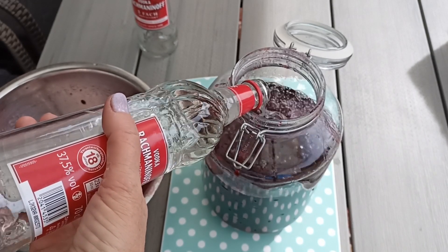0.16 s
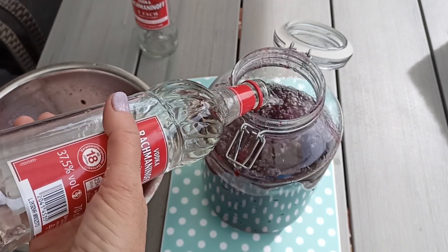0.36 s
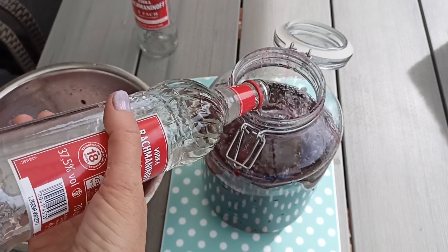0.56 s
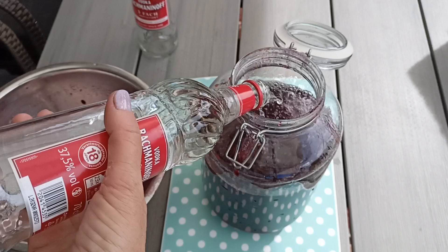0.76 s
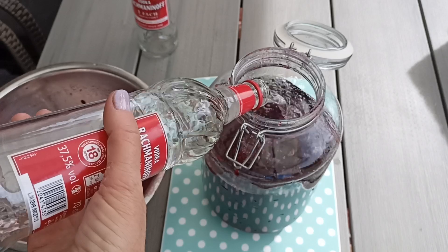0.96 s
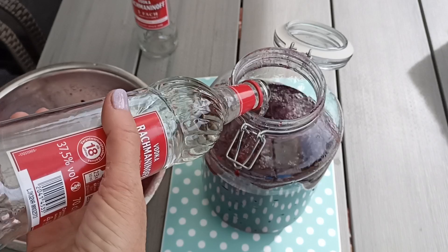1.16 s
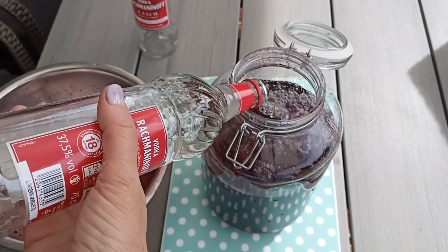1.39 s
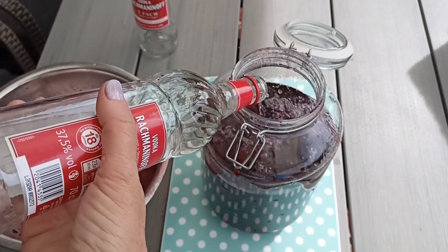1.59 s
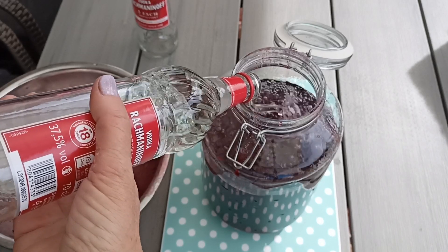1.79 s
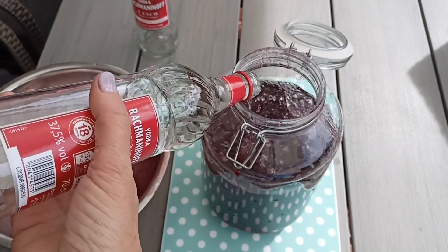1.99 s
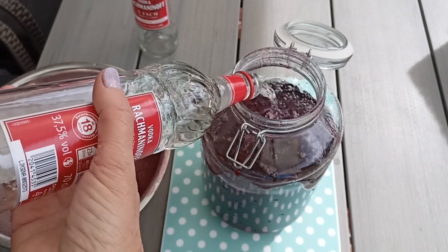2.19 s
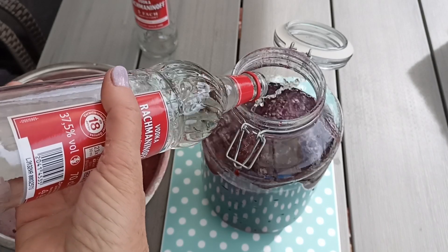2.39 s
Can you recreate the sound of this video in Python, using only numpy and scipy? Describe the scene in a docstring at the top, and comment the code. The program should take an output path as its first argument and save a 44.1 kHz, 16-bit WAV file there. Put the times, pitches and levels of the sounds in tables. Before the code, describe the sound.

Liquor glugs unevenly from a glass bottle into a jar of berries; hollow low gulps alternate with crisp splashes, fizzing bubbles and faint glassy drops, heard close and dry outdoors over very quiet rumble.

```python
"""Bottle poured over berries

Liquor glugs out of an upended glass bottle into a jar of berries on an outdoor table.
Gulps of air ring the bottle's air space, a low thump and higher modes; the stream slaps and pops on
the berries as short rings with splashes of fizz; larger bubbles knock in the neck, drops ring the jar,
some bubbles sing as gliding sines. Fizz, a low slosh and a quiet outdoor rumble are filtered noise."""
import sys
import numpy as np
from scipy import signal
from scipy.io import wavfile

SR = 44100
rng = np.random.default_rng(int(sys.argv[2]) if len(sys.argv) > 2 else 0)


def log_audio(samples):
    """Write samples as a 16-bit WAV file to the path given in sys.argv[1]."""
    # one column per channel
    frames = np.atleast_2d(samples).T
    # limit to full scale, then quantise
    limited = np.clip(frames, -1, 1)
    pcm = np.round(limited * 32767).astype(np.int16)
    wavfile.write(sys.argv[1], SR, pcm)


N = 108045   # length in samples

# Strength of the stream. Each row: time in seconds, level in dB.
FLOW = [(0, -46), (.75, -45.5), (.95, -55), (1.14, -44), (1.87, -48.5), (2.45, -45.5)]
# The stream thins out, then surges again. Each row: start in seconds, end in seconds, final depth in dB.
LULLS = [(0.334, 0.453, 14), (0.774, 0.873, 7), (1.359, 1.436, 11.5), (1.769, 1.824, 15),
         (1.978, 2.015, 12.5), (2.402, 2.432, 9.5)]

# Fizz spectrum. Each row: frequency in Hz, relative density in dB per Hz.
FIZZ_SPECTRUM = [(500, -6.5), (678, -7), (2160, -13.5), (2360, 9.5), (3150, -0.5), (3590, -5), (7980, 0.5),
                 (10200, -18.5), (16000, -5.5)]
FIZZ_PER_S, FIZZ_SPREAD_DB, FIZZ_CYCLES = 120, 6.3, 49   # per pitch band
FIZZ_NOISE_DB, SPRAY_NOISE_DB, FIZZ_DB = -5.5, -1, -21   # spray: noise from the hiss edge up
HISS_EDGE_HZ, DIP_HZ, DIP_Q = 9500, 2460, 1.32   # dip in the jar's mouth
SPLASH_DB, SPLASH_DB_PER_OCT2, HISS_DB = -21, 6.8, -13
BODY_DB, KNOCK_DB_PER_OCT2, KNOCK_SPLASH_T60_S = -26.5, 1.17, .04
FIRST_DB = 9   # first bubble of a burst

GURGLE_HZ, GURGLE_DB = 310, -61.5
FLOOR_DB, FLOOR_HZ = -73.5, 81

# Slaps of the stream on the berries. Each row: start in seconds, level in dB, pop pitch in Hz,
# relative hiss above HISS_EDGE_HZ in dB (before HISS_DB), splash t60 in seconds.
SLAPS = [(0.023, -35.5, 5940, 11.5, 0.023), (0.0932, -33, 7550, 1, 0.25), (0.1528, -30, 6500, 1, 0.034),
         (0.19, -21, 7090, 1, 0.089), (0.2574, -25.5, 6820, -1, 0.089), (0.312, -33.5, 7970, 8, 0.042),
         (0.392, -38, 8700, 20, 0.13), (0.456, -28.5, 4500, 0, 0.049), (0.568, -29.5, 4950, 8, 0.078),
         (0.6345, -33, 7950, -12, 0.064), (0.6612, -30, 4000, 7.5, 0.06), (0.8731, -41.5, 7300, 13, 0.051),
         (0.908, -34, 7130, 8, 0.079), (0.9865, -34, 4070, 1.5, 0.29), (1.067, -30.5, 3360, -2, 0.25),
         (1.281, -32, 5080, 5, 0.04), (1.3436, -33.5, 6130, 15.5, 0.059), (1.4393, -28, 5700, 2.5, 0.061),
         (1.498, -35.5, 3330, -20, 0.19), (1.5227, -31, 7100, 7, 0.072), (1.532, -27, 5160, -2, 0.016),
         (1.573, -35, 4660, -5, 0.054), (1.591, -37.5, 6300, -7, 0.089), (1.621, -31, 7130, 2, 0.089),
         (1.7495, -42, 8450, 20, 0.023), (1.8294, -29, 3110, 8, 0.17), (1.975, -34, 8070, 11.5, 0.24),
         (2.0888, -33.5, 4680, 9.5, 0.041), (2.1233, -36.5, 7160, 14, 0.033),
         (2.159, -21.5, 8200, 2, 0.011), (2.186, -30.5, 8300, -1, 0.11), (2.23, -32, 3030, 3, 0.067),
         (2.323, -38, 7460, 6, 0.075)]
POP_CYCLES, POP_DB = 190, -3.5

# Gulps of air entering the bottle. Each row: start in seconds, level in dB,
# relative thump level in dB (before THUMP_GAIN_DB), air-space t60 in seconds.
GULPS = [(0.079, -42.5, 10.5, 0.034), (0.189, -19.5, -2.5, 0.14), (0.261, -39.5, -39, 0.17),
         (0.308, -42.5, 4.5, 0.18), (0.5, -42.5, 1, 0.039), (0.566, -18, -1.5, 0.2),
         (0.969, -44.5, 9.5, 0.037), (0.987, -23.5, 1, 0.22), (1.065, -28, -12, 0.085),
         (1.094, -33.5, -6, 0.33), (1.19, -48.5, 16.5, 0.54), (1.337, -41, -1.5, 0.19),
         (1.44, -27.5, 4, 0.38), (1.682, -48, -18, 0.48), (1.831, -21, -1, 0.26), (1.904, -27, -20, 0.19),
         (2.037, -30, -12.5, 0.12), (2.333, -45, 5, 0.13)]
# Further bottle modes. Each row: frequency in Hz, relative level in dB, t60 in seconds.
BOTTLE_MODES = [(474, -17, 0.068), (1375, -34, 0.37), (2115, -34, 0.15)]
AIR_HZ, THUMP_HZ, THUMP_T60_S, THUMP_GAIN_DB = 423, 253.3, 0.075, -6.5
GULP_SOFT_HZ, GULP_CUT_HZ, QUENCH_S = 925, 229, 0.0011
WAVER_DEPTH = .22   # rms unsteadiness of the gulps

# Larger bubbles knocking in the neck. Each row: start in seconds, pitch in Hz, level in dB.
KNOCKS = [(0.096, 564, -32), (0.227, 1010, -39), (0.254, 1950, -40), (0.31, 1010, -43), (0.622, 850, -42),
          (0.733, 970, -42.5), (1.117, 1450, -41.5), (1.142, 2130, -34), (1.19, 720, -40), (1.2, 1730, -38),
          (1.211, 690, -36), (1.499, 2060, -38), (1.591, 2050, -37), (1.682, 816, -34), (1.83, 1030, -38.5),
          (1.847, 1410, -32.5), (1.862, 930, -35), (1.876, 990, -39), (2.029, 960, -34.5),
          (2.039, 750, -29), (2.054, 820, -36.5), (2.071, 2100, -36), (2.438, 970, -40.5)]
KNOCK_CYCLES = 13

# Drops that set the jar ringing. Each row: start in seconds, level in dB.
JAR_TAPS = [(0.311, -48.5), (.456, -48), (.567, -42), (0.733, -62), (0.913, -52), (1.065, -42.5),
            (1.194, -43), (1.517, -55), (1.757, -53.5), (2.139, -48), (2.192, -45.5), (2.29, -53.5),
            (2.437, -51)]
JAR_HZ, JAR_T60_S = 2829, 0.13

# Singing bubbles, plus one steady tone of the bottle's mode near 1400 Hz (the row at 1.722 s). Each row: start
# in seconds, # length in seconds, start pitch in Hz, end pitch in Hz, level in dB.
SINGERS = [(0.523, 0.05, 3160, 3210, -33), (1.152, 0.038, 550, 1300, -36.5),
           (1.545, 0.044, 685, 1010, -47.5), (1.57, 0.1, 2760, 2920, -47.5),
           (1.627, 0.058, 904, 994, -41.5), (1.722, 0.095, 1400, 1380, -56),
           (1.841, 0.077, 3090, 3110, -34.5), (1.943, 0.063, 2550, 2960, -41),
           (2.385, 0.1, 2760, 2560, -50)]
FLUTTER_HZ, FLUTTER_DEPTH = 85, 0.47   # top of the flutter band, rms depth
SINGER_ATTACK, GLIDE_SWELL, SINGER_FADE_DB = .03, .28, 26   # first two: shares of the length

CUTOFF_HZ = 16100


def amp(db):
    """Amplitude factor of a level in dB."""
    return 10 ** (np.asarray(db) / 20)


def unit(x):
    """Scale to an rms of 1."""
    return x / np.sqrt(np.mean(x ** 2) + 1e-20)


def ring(x, hz, t60_s):
    """Two-pole resonator: a unit click sets a decaying sine of height 1 ringing."""
    radius, w = amp(-60 / (max(t60_s, .001) * SR)), 2 * np.pi * hz / SR
    return signal.lfilter([0, np.sin(w)], [1, -2 * radius * np.cos(w), radius * radius], x + 1e-18)


def band(x, lo_hz, hi_hz):
    """Butterworth band-pass."""
    return signal.sosfilt(signal.butter(2, [lo_hz, min(hi_hz, .45 * SR)], "band", fs=SR, output="sos"), x)


def add(out, start_s, x):
    """Mix x into out, cut at the end."""
    i = int(start_s * SR)
    out[i:i + len(x)] += x[:len(out) - i]


def fizz(flow_db):
    """Bubbles of many sizes: the flow feeds all, slaps and knocks feed those near their pitch and the hiss."""
    pitches_hz = np.geomspace(500, 15700, 56)
    spectrum_hz, density_db = np.transpose(FIZZ_SPECTRUM)
    tone = amp(np.interp(np.log(pitches_hz), np.log(spectrum_hz), density_db)) * np.sqrt(pitches_hz)
    level = np.outer(unit(tone), amp(FIZZ_DB + flow_db))
    first = np.zeros_like(level)
    t = np.arange(SR // 4) / SR

    bursts = [(s, hz, db + SPLASH_DB, hiss_db + HISS_DB, t60_s, SPLASH_DB_PER_OCT2)
              for s, db, hz, hiss_db, t60_s in SLAPS]
    bursts += [(s, hz, db + BODY_DB, -60, KNOCK_SPLASH_T60_S, KNOCK_DB_PER_OCT2) for s, hz, db in KNOCKS]
    for s, hz, db, hiss_db, t60_s, db_per_oct2 in bursts:
        near = amp(-db_per_oct2 * np.log2(pitches_hz / hz) ** 2) * (pitches_hz < HISS_EDGE_HZ)
        near = near + amp(hiss_db) * (pitches_hz > HISS_EDGE_HZ)
        decay = amp(db - 60 * t / max(t60_s, .01))
        i = int(s * SR)
        level[:, i:i + len(t)] += np.outer(near, decay)[:, :N - i]
        onset = near * amp(db + FIRST_DB + rng.normal(0, 1.0, len(near)))
        first[:, i] += onset * rng.choice([-1, 1], len(near))

    out = np.zeros(N)
    for hz, gain, onset in zip(pitches_hz, level, first):
        sizes = amp(FIZZ_SPREAD_DB * np.minimum(rng.exponential(1, N), 3.1))
        bubbles = sizes * (rng.random(N) < FIZZ_PER_S / SR)
        noise_db = FIZZ_NOISE_DB if hz < HISS_EDGE_HZ else SPRAY_NOISE_DB
        drive = unit(bubbles) + amp(noise_db) * rng.standard_normal(N)
        focused = signal.lfilter(*signal.iirpeak(hz, 4.0, SR), drive * gain + onset)
        t60_s = FIZZ_CYCLES / hz
        out += ring(focused, hz, t60_s) / np.sqrt(t60_s * SR / 28)
    return signal.lfilter(*signal.iirnotch(DIP_HZ, DIP_Q, SR), out)


def gurgle(flow_db):
    """Low slosh in the bottle that keeps the air space murmuring."""
    noise = rng.standard_normal(N)
    slosh = unit(band(noise, 83, GURGLE_HZ))
    murmur = 0.14 * unit(ring(noise, AIR_HZ, 1.0))
    return amp(GURGLE_DB + flow_db - flow_db.mean()) * (slosh + murmur)


def outdoor_floor():
    """Outdoor rumble: steady low-band noise."""
    return amp(FLOOR_DB) * unit(band(rng.standard_normal(N), 12, FLOOR_HZ))


def slaps():
    """The first bubble of each slap pops as a ring at its own pitch."""
    out, click = np.zeros(N), np.eye(1, SR // 5)[0]
    for s, db, hz, _, _ in SLAPS:
        t60_s = POP_CYCLES / np.sqrt(hz * 6000)
        add(out, s, amp(db + POP_DB) * ring(click, hz, t60_s))
    return out


def gulps():
    """A soft push rings the air space and thump, a click the higher modes; the next gulp quenches them."""
    out, click = np.zeros(N), np.eye(1, SR // 3)[0]
    pole = np.exp(-2 * np.pi * GULP_SOFT_HZ / SR)
    push = signal.lfilter([(1 - pole) ** 2], [1, -2 * pole, pole * pole], click)
    upper = sum(amp(db) * ring(click, hz, t60_s) for hz, db, t60_s in BOTTLE_MODES)
    thump = ring(push, THUMP_HZ, THUMP_T60_S)
    t = np.arange(len(click)) / SR
    next_starts_s = [gulp[0] for gulp in GULPS[1:]] + [N / SR]
    for (s, db, thump_db, t60_s), next_s in zip(GULPS, next_starts_s):
        quench = np.clip((next_s - s - t) / QUENCH_S, 0, 1)
        body = ring(push, AIR_HZ, t60_s) + amp(thump_db + THUMP_GAIN_DB) * thump + upper
        add(out, s, -amp(db) * quench * body)
    out = out * (1 + WAVER_DEPTH * unit(band(rng.standard_normal(N), 14.2, 46)))
    return signal.sosfilt(signal.butter(4, GULP_CUT_HZ, "high", fs=SR, output="sos"), out)


def knocks():
    """Each larger bubble rings for a set number of cycles of its pitch."""
    out, click = np.zeros(N), np.eye(1, SR // 5)[0]
    for s, hz, db in KNOCKS:
        add(out, s, amp(db) * ring(click, hz, KNOCK_CYCLES / hz))
    return out


def jar_taps():
    """Drops ring one jar mode, its pitch slightly different each time."""
    out, click = np.zeros(N), np.eye(1, SR // 5)[0]
    for s, db in JAR_TAPS:
        hz = JAR_HZ * (1 + rng.normal(0, 0.0053))
        add(out, s, amp(db) * ring(click, hz, JAR_T60_S))
    return out


def singers():
    """Fluttering sines, mostly bubbles and one bottle tone: wide glides swell and hold, steady pitches start
    fast and fade."""
    out = np.zeros(N)
    flutter = 1 + FLUTTER_DEPTH * unit(band(rng.standard_normal(N), 4.8, FLUTTER_HZ))
    for s, length_s, start_hz, end_hz, db in SINGERS:
        u = np.linspace(0, 1, int(length_s * SR))
        glide = min(1, abs(np.log2(end_hz / start_hz)))   # octaves, at most 1
        swell = SINGER_ATTACK + GLIDE_SWELL * glide
        edges = np.minimum(1, np.minimum(u / swell, (1 - u) / (swell + 0.085)))
        shape = edges * amp(db - SINGER_FADE_DB * (1 - glide) * u)
        pitch_hz = start_hz + (end_hz - start_hz) * np.sqrt(u)
        add(out, s, shape * np.sin(2 * np.pi * np.cumsum(pitch_hz) / SR))
    return out * flutter


def lulls(t):
    """Level change in dB: each lull deepens as a square root, then ends at once."""
    return sum(-db * np.sqrt(np.clip((t - start_s) / (end_s - start_s), 0, 1)) * (t < end_s)
               for start_s, end_s, db in LULLS)


def scene():
    """Sum of all sources in one channel; lulls thin the fizz, splashes included, and the gurgle."""
    t = np.arange(N) / SR
    lull_db = lulls(t)
    flow_db = np.interp(t, *np.transpose(FLOW))
    stream = amp(lull_db) * fizz(flow_db) + gurgle(flow_db + lull_db)
    events = slaps() + gulps() + knocks() + jar_taps() + singers()
    return (stream + outdoor_floor() + events)[None]


def record(dry):
    """The microphone loses the deepest bass; the top is cut steeply."""
    dry = signal.sosfilt(signal.butter(2, 60, "high", fs=SR, output="sos"), dry)
    return signal.sosfilt(signal.cheby2(14, 60, CUTOFF_HZ + 500, fs=SR, output="sos"), dry)


dry = scene()
out = record(dry)
log_audio(out)
```